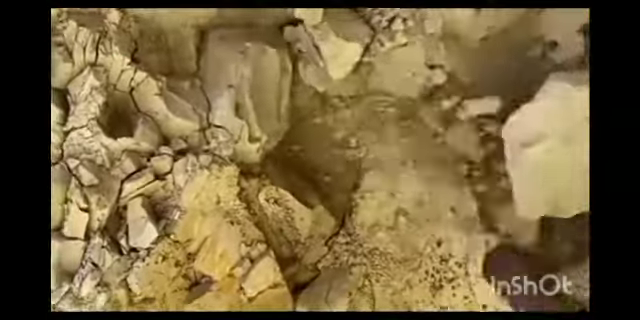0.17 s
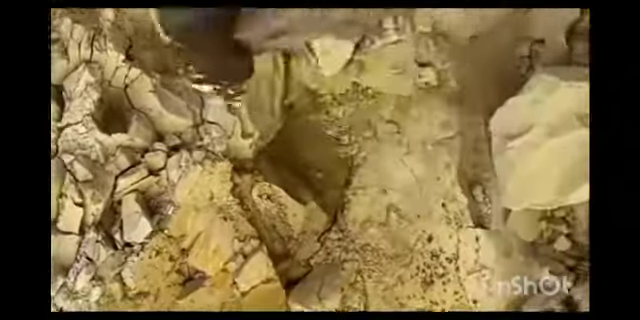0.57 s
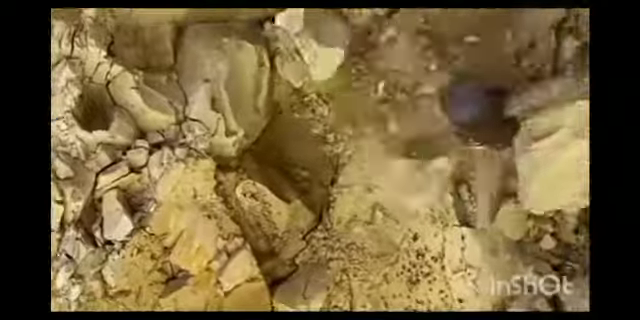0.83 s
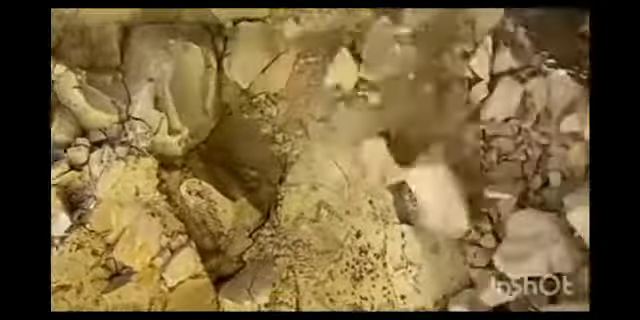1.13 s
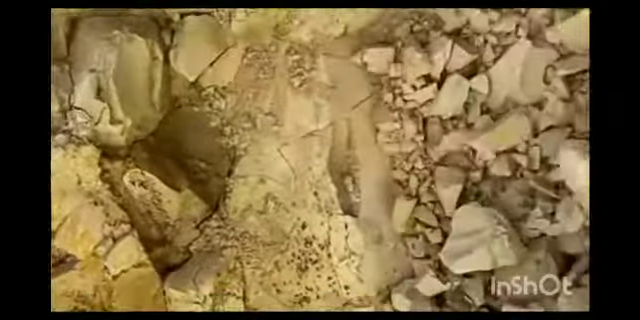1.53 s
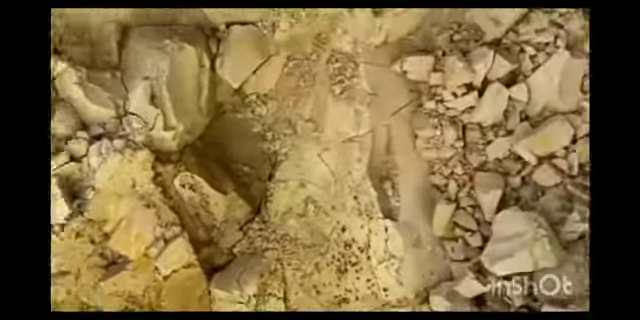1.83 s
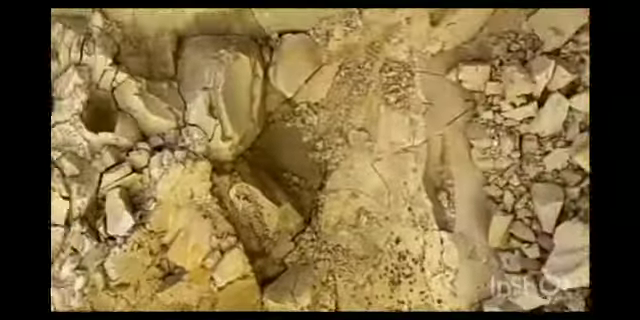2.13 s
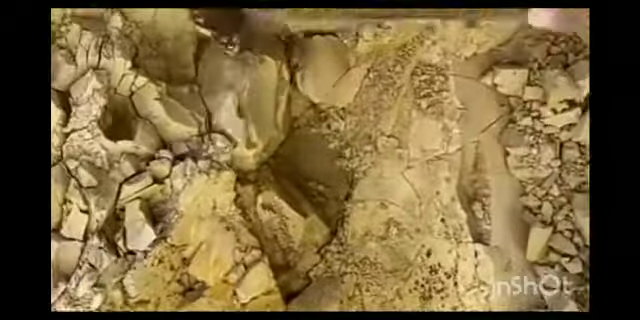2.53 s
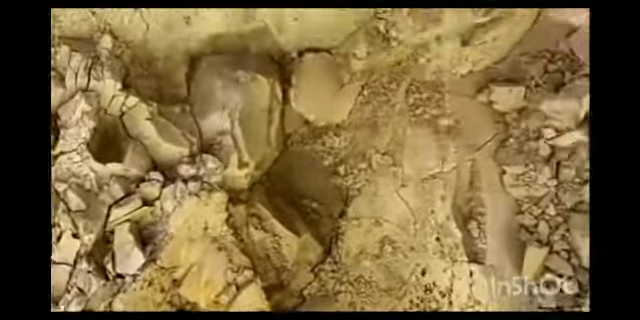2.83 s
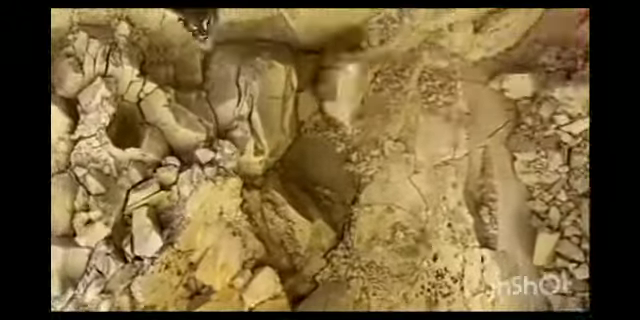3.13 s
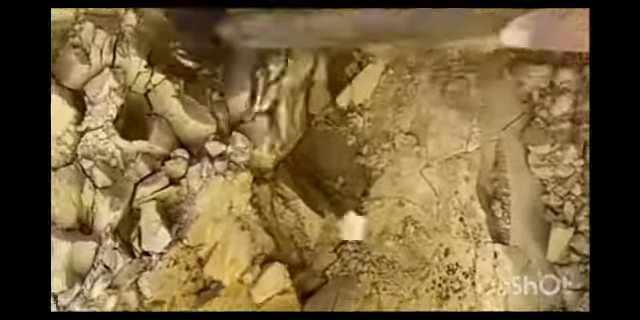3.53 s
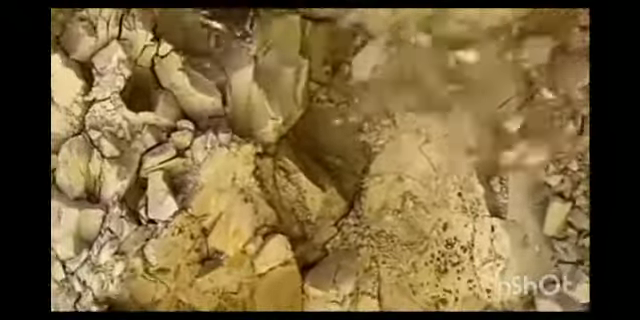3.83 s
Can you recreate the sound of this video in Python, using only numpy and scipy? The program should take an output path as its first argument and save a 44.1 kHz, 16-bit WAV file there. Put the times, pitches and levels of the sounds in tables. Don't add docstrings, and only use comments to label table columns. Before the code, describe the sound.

Dry clay shards knock, crack and crunch as a hammer head drags through and strikes them

```python
import sys
import numpy as np
from scipy import signal
from scipy.fft import rfft, irfft, next_fast_len
from scipy.io import wavfile
from scipy.ndimage import uniform_filter1d, map_coordinates

SR = 44100
rng = np.random.default_rng(int(sys.argv[2]) if len(sys.argv) > 2 else 0)


def nominal_scale(level):
    x = np.asarray(level, float) / 20
    return 10 ** x


def put_to_file(sound):
    columns = np.atleast_2d(sound).T
    safe = np.clip(columns, -1, 1)
    whole_steps = np.round(safe * 32767)
    wavfile.write(sys.argv[1], SR, whole_steps.astype(np.int16))


N = 176400
TIME_S = np.arange(N) / SR

# start_s, peak_db, pitch_hz, body_db
KNOCKS = [(0.0415, -20.5, 3843, -9), (0.1143, -9, 3074, -22.5), (0.147, 2, 3530, -19.5),
          (0.1807, -19, 3653, -15), (0.384, -10.5, 3490, -32), (0.4606, -9.5, 3244, -57),
          (0.4748, 1, 3335, -43.5), (0.4784, -3, 3320, -20), (0.5138, -18, 3456, -19),
          (0.5671, -6, 2876, -21), (0.606, -10, 2844, -12.5), (0.6766, -7, 3590, -18),
          (0.7195, -16, 3680, -18), (0.9479, -21, 3570, -14), (1.0556, -5.5, 3592, -21),
          (1.0834, -19, 3350, -15), (1.2121, -19.5, 3724, -26), (1.291, -12.5, 3720, -34.5),
          (1.3099, -10, 3663, -35.5), (1.3534, -19.5, 3480, -40.5), (1.3669, -11, 3568, -36),
          (1.5528, -11.5, 3454, -16), (1.5953, -8.5, 3645, -28),
          (1.7468, -12, 3360, -13.5), (1.8054, -15, 3076, -31), (1.8465, -20.5, 3394, -5),
               (1.946, -13.5, 3310, -16), (2.8135, -36, 3240, 8.5), (2.9477, -21, 3660, -17),
               (2.9971, -9.5, 3463, -22.5), (3.016, -12.5, 3610, -32), (3.0644, -15.5, 3123, -33),
               (3.1315, -21, 3574, -18), (3.1779, -15.5, 3670, -19), (3.2414, -3.5, 3336, -25),
               (3.3295, -8.5, 3280, -25.5), (3.6481, -7.5, 3304, -18.5), (3.6668, -21.5, 3530, -15),
               (3.706, -22, 3670, -23), (3.7179, -5.5, 3560, -31), (3.8394, -15, 3050, -8),
               (3.8699, -10.5, 3130, -28), (3.8944, -30, 2980, 1), (3.932, -19, 3708, -39.5),
               (3.9598, -12.5, 3856, -37)]
# start_s, peak_db, pitch_hz, body_db, length_s
CRUNCHES = [(0.071, -16, 2947, -12.5, 0.012), (0.076, -13.5, 3030, -31, 0.008),
            (0.081, -16, 3464, -22, 0.0048), (0.095, -15.5, 3570, -14.5, 0.019),
            (0.141, -19, 3474, -9.5, 0.012), (0.264, -18.5, 3527, -13.5, 0.017),
            (0.283, -18, 3430, -13, 0.034), (0.462, -19.5, 3600, -29.5, 0.017), (0.557, -15, 3750, -26, .013),
            (1.557, -19, 3660, -30.5, .02), (1.682, -17.5, 3580, -19, 0.02), (1.737, -15.5, 3650, -21, 0.051),
            (1.994, -20.5, 3140, -15, 0.031), (2.022, -13.5, 3225, -13, 0.04),
            (2.396, -28.5, 2998, -16.5, 0.03), (2.73, -27, 2950, -8, .022), (2.75, -13.5, 3624, -13, 0.014),
            (3.036, -19, 3300, -28, 0.035), (3.2523, -20.5, 2680, -20, 0.0079),
            (3.2603, -3.5, 3210, -19, 0.007), (3.752, -17.5, 3122, -14.5, .018),
            (3.7716, -5, 2577, -15.5, 0.0093), (3.837, -16.5, 2800, -26.5, 0.013),
            (3.42, -30, 3258, -31, 0.037),
            (1.03, -17, 3790, -23.5, 0.0055),
    (1.167, -23, 3650, -18.5, .03),
    (1.251, -22, 3875, -21, .05),
    (1.337, -19, 3920, -34, 0.046),
    (1.429, -28, 3883, -25, 0.074),
    (3.695, -18.5, 3370, -16.5, 0.036),
]
# start_s, peak_db, pitch_hz
FRACTURES = [(0.0737, -11.3, 2860), (0.079, -5.0, 2830), (0.0812, -9.9, 2980), (0.0829, -12.5, 2970),
             (0.0854, -8.8, 3210), (0.0871, 1.7, 3190), (0.0895, 1.0, 3260), (0.0919, -5.3, 3340),
             (0.1025, -13.9, 3330), (0.1073, -11.3, 3200), (0.144, -11.1, 3240), (0.1491, -10.0, 3130),
             (0.152, -9.0, 3190), (0.2817, -12.9, 3350), (0.4729, -14.3, 3320), (1.0278, -12.5, 3490),
             (1.0307, -14.9, 3640), (1.0607, -12.1, 3430), (1.466, -14.7, 3620), (1.5651, -14.1, 3400),
             (1.5694, -14.9, 3520), (1.6631, -14.1, 3600), (1.6855, -13.4, 3140), (1.6869, -13.8, 3280),
             (1.6893, -12.8, 3240), (1.6917, -8.6, 3390), (1.6951, -11.5, 3420), (1.6999, -14.7, 3320),
             (1.7609, -13.0, 3420), (2.0263, -9.1, 3200), (2.0288, -6.4, 3120), (2.0308, -12.0, 2970),
             (2.0341, -4.4, 3280), (2.0378, -6.1, 2860), (2.0396, -8.6, 2940), (2.0416, -8.9, 3360),
             (2.0437, -9.3, 3280), (2.0463, -11.7, 3270), (2.0482, -9.1, 3370), (2.7529, -9.9, 3200),
             (2.7568, -12.7, 3400), (3.2576, -4.4, 2790), (3.2592, -4.7, 2850), (3.2615, -7.2, 2780),
             (3.2632, 3.3, 3020), (3.265, 3.6, 3220), (3.2703, -14.0, 3340), (3.7494, -12.7, 3170),
             (3.7508, -13.9, 3110), (3.7524, -14.2, 3110), (3.7606, -12.1, 3240), (3.762, -12.7, 3140),
             (3.7686, -8.3, 2810), (3.7716, 2.6, 2970), (3.774, 1.6, 2530), (3.7757, 2.5, 2910),
             (3.778, 3.0, 3090), (3.7795, -3.4, 3200), (3.782, -12.8, 2900), (3.8406, -11.9, 3060)]
# start_s, level_db, pitch_hz, t60_s
RINGING_TONES = [(2.5, -41, 3780, .6), (0.1, -34.5, 5100, 0.17), (0.564, -23, 1320, 0.044),
                 (0.84, -35, 1330, 0.24), (1.24, -24, 1184, 0.031), (2.2, -34.5, 2400, 0.057),
                 (2.403, -34.5, 4500, 0.13), (.068, -19, 900, 0.013), (3.773, -12.5, 1400, .015),
                 (4.2, -25.5, 1850, 0.043), (.478, -26, 1400, 0.037), (1.059, -29.5, 1300, 0.052),
                 (3.244, -30, 3700, .45),
    (3.265, -31, 3690, .4),
    (3.72, -30, 3700, .5),
    (3.78, -32, 3710, .4),
]
# time_s, level_db
DRAG_LEVEL = [(0, -37), (.28, -36), (.5, -33.5), (.76, -48.5), (1.08, -41.5), (1.26, -34.5), (1.5, -28),
              (1.66, -27), (1.82, -35.5), (2.1, -45), (2.64, -48.5), (2.78, -52), (2.95, -45),
              (3.13, -40.5), (3.3, -38), (3.37, -57.5), (3.45, -39), (4, -40.5)]
# freq_hz, level_db
CLAY_RESPONSE = [(240, -65.5), (400, -49), (669, -35), (779, -25.5), (1280, -16.5), (2330, -19.5),
                 (3610, 0), (3900, -1), (5070, -40.5), (8580, -120)]
# freq_hz, level_db
AIR_RESPONSE = [(12, -35), (20, -0.5), (70, -7), (170, -7.5), (260, -17), (598, -9.5), (1290, -4.5),
                (1760, -15.5), (2510, -4), (3900, -15), (5070, -48), (8580, -120)]
# time_s, level_db
AIR_LEVEL = [(0, -56.5), (2.5, -54.5), (2.76, -56), (4, -60)]
# freq_hz, dropped_share
DROPPED_SHARE = [(700, 0), (1400, .38), (2400, .42), (3000, .15), (4000, .12)]
# start_s, end_s
STARVED_SPANS = [
    (1.0, 1.12),
    (2.66, 2.74),
    (2.775, 3.03),
]
# freq_hz, level_db
STARVED_FLOOR = [(200, -83), (900, -79), (1700, -73), (2250, -60), (2800, -74), (4000, -77)]
# freq_hz, level_db
MIRROR_RESPONSE = [(3700, 1), (4050, -9.5), (4350, -19.5), (4550, -40.5), (4650, -100)]

GRAIN_S, BODY_HZ = 0.000786, 1504


def unit(x):
    return x / np.sqrt(np.mean(x ** 2) + 1e-20)


def along(points, hz):
    freq_hz, value = np.transpose(points)
    return np.interp(np.log(hz + 1), np.log(freq_hz + 1), value)


def curve(rows):
    time_s, value = np.transpose(rows)
    return np.interp(TIME_S, time_s, value)


def wobble(rate_hz):
    knots = rng.standard_normal(int(N * 200 / SR) + 4)
    return unit(map_coordinates(knots, [TIME_S * rate_hz]))


def filtered(x, response):
    size = next_fast_len(N + SR // 2)
    return irfft(rfft(x, size) * response(np.fft.rfftfreq(size, 1 / SR)), size)[..., :N]


def draws(rows, count):
    return rng.standard_normal((rows, 5, count)).transpose(1, 0, 2)


def grains(start_s, gain, pitch_hz, life_s):
    at = np.round(start_s * SR).astype(int)[:, None] + np.arange(-200, 300)
    t = at / SR - start_s[:, None]
    width_s = life_s[:, None] * np.where(t > 0, 1.4, 1)
    shape = np.exp(-.5 * (t / width_s) ** 2)
    wave = gain[:, None] * shape * np.sin(2 * np.pi * pitch_hz[:, None] * t)
    return np.bincount(np.clip(at, 0, N).ravel(), wave.ravel(), N + 1)[:N]


def cluster(start_s, level_db, pitch_hz, body_db, offset_s, chance):
    high, long, low = chance
    long = long.ravel()
    at_s = (start_s[:, None] + offset_s).ravel()
    gain = nominal_scale(level_db).ravel()
    ring_hz = (pitch_hz[:, None] * np.exp(0.13 * high)).ravel()
    life_s = np.clip(GRAIN_S * np.exp(0.19 * long), 0, .0015)
    body_gain = gain * nominal_scale(body_db[:, None] + 0 * offset_s).ravel()
    snap = grains(at_s - life_s, gain * nominal_scale(-12), 2840 * np.exp(0.24 * long), 0.00024 + 0 * life_s)
    ring = grains(at_s, gain, ring_hz, life_s)
    body = grains(at_s, body_gain, BODY_HZ * np.exp(0.32 * low.ravel()), 0.81 * life_s)
    return snap + ring + body


def crunches(count=20):
    start_s, peak_db, pitch_hz, body_db, length_s = np.transpose(CRUNCHES)
    *chance, when, size = draws(len(start_s), count)
    progress = (np.arange(count) + .5 + 0.4365 * when) / count
    crowd_db = 10 * np.log10(np.clip(length_s / (count * 2 * GRAIN_S), 0, 1))
    rise_db = -17 * np.clip(.35 - progress, 0, 1)
    fall_db = -14 * np.clip(progress - .45, 0, 1)
    level_db = (peak_db + crowd_db)[:, None] - 2 + rise_db + fall_db + 1.7 * size
    return cluster(start_s, level_db, pitch_hz, body_db, length_s[:, None] * progress, chance)


def cracks():
    start_s, peak_db, pitch_hz = np.transpose(FRACTURES)
    long, body, thud = rng.standard_normal((len(start_s), 3)).T
    gain = nominal_scale(peak_db - 2.5)
    life_s = .00058 * np.exp(0.095 * long)
    ring = grains(start_s, gain, pitch_hz, life_s)
    dull = grains(start_s, gain * nominal_scale(-19), 2114 * np.exp(0.19 * body), life_s)
    low = grains(start_s, gain * nominal_scale(-28), 0.71 * BODY_HZ * np.exp(.4 * thud), life_s)
    return ring + dull + low


def ticks(count=5):
    chip_spread_s, chip_db = 0.0067, -23
    start_s, peak_db, pitch_hz, body_db = np.transpose(KNOCKS)
    chip = np.arange(count) > 0
    *chance, when, size = draws(len(start_s), count) * np.where(chip, 1, .2)
    offset_s = 1.5 * GRAIN_S + chip * chip_spread_s * (when + 0.4)
    level_db = peak_db[:, None] - 5 + chip * (chip_db + 3 * size)
    return cluster(start_s, level_db, pitch_hz, body_db, offset_s, chance)


def rings():
    out = np.zeros(N)
    for start_s, level_db, pitch_hz, t60_s in RINGING_TONES:
        t = TIME_S - start_s
        decay = nominal_scale(level_db - 60 * np.abs(t) / t60_s + 2.9 * wobble(79))
        onset = np.clip(t / 0.0019, 0, 1)
        out += decay * onset * np.sin(2 * np.pi * pitch_hz * TIME_S)
    return out


def drag():
    clicks_hz, size_db = 1500, 2.5
    hits = rng.random(N) < clicks_hz / SR
    clicks = hits * nominal_scale(size_db * rng.exponential(size=N)) * rng.standard_normal(N)
    rub = unit(clicks) + rng.standard_normal(N)
    grit = filtered(rub, lambda f: nominal_scale(along(CLAY_RESPONSE, f)))
    swing = nominal_scale(1.1 * wobble(14) + 1.7 * wobble(45))
    return nominal_scale(curve(DRAG_LEVEL) + 2.5) * unit(grit * swing)


def air():
    noise = filtered(rng.standard_normal(N), lambda f: nominal_scale(along(AIR_RESPONSE, f)))
    return nominal_scale(curve(AIR_LEVEL) + 9) * unit(noise)


def thinned(x):
    frame = dict(fs=SR, window="cosine", nperseg=8192)
    hz, _, z = signal.stft(x, **frame)
    luck = unit(uniform_filter1d(rng.standard_normal(z.shape), size=4, axis=1))
    luck = luck[np.arange(len(hz)) // 6]
    share = along(DROPPED_SHARE, hz)[:, None]
    kept = 1 / (1 + np.exp(-1.7 * luck)) > share
    return signal.istft(z * kept / np.sqrt(1 - share), **frame)[1][:N]


def scene():
    dip_s, dip_length_s, dip_db = 2.787, .009, -11
    duck = nominal_scale(dip_db * np.exp(-((TIME_S - dip_s) / dip_length_s) ** 4))
    bed = duck * thinned(drag() + air())
    return (crunches() + cracks() + ticks() + rings() + bed)[None]


def starved(x):
    frame = dict(fs=SR, window="cosine", nperseg=1408)
    hz, t, z = signal.stft(x, **frame)
    band = np.arange(len(hz)) // 4 * 4 + 2
    level = uniform_filter1d(np.abs(z), size=4, axis=1)[:, np.minimum(band, len(hz) - 1)]
    short = sum((t > a) & (t < b) for a, b in STARVED_SPANS) > 0
    ragged_db = 6 * rng.standard_normal(z.shape[1:])[band // 4]
    weak = level < nominal_scale(along(STARVED_FLOOR, hz)[:, None] + ragged_db)
    return signal.istft(z * ~(short & weak), **frame)[1][:, :N]


def sampled(x):
    low = filtered(x, lambda f: f < 3950)
    both = low * (1 + 2 * np.cos(2 * np.pi * 8000 * TIME_S))
    return filtered(both, lambda f: nominal_scale(along(MIRROR_RESPONSE, f)) * (f < 4700))


def saturated(x):
    ceiling, knee, sag_s, delay_s = .72, 30, .05, .006
    y = x / (1 + np.abs(x / ceiling) ** knee) ** (1 / knee)
    excess = np.minimum(np.abs(x - y), .05)
    late = np.roll(excess, round(delay_s * SR), axis=1)
    keep = np.exp(-1 / (sag_s * SR))
    sag = signal.lfilter([1], [1, -keep], late, axis=1) * 0.025 * 0.11
    return y - sag


def faint_click():
    return nominal_scale(-38) * np.exp(-((TIME_S - 1.0312) / .00005) ** 2)


def roll_off(x):
    return signal.sosfilt(signal.butter(12, 15500, fs=SR, output="sos"), x)


def record(dry):
    mix = saturated(sampled(starved(dry))) + faint_click()
    return roll_off(mix)


dry = scene()
out = record(dry)
put_to_file(out)
```